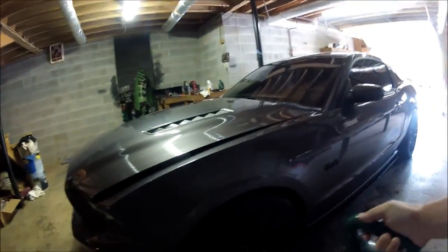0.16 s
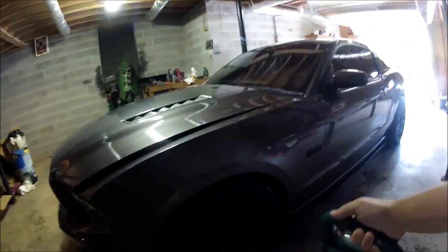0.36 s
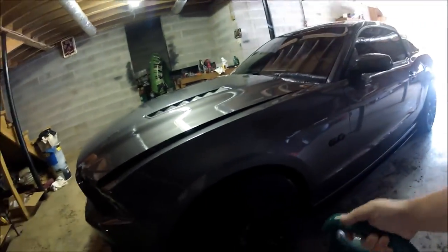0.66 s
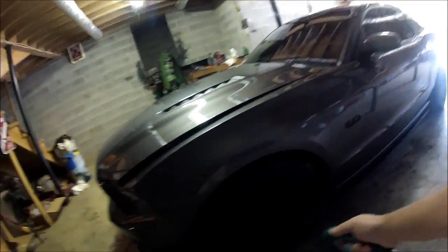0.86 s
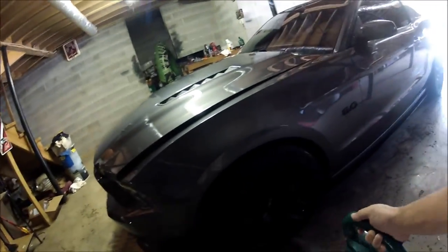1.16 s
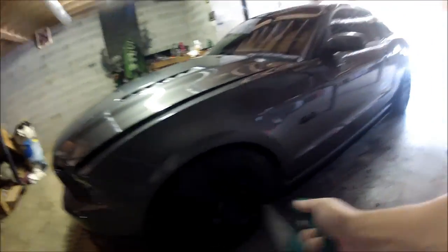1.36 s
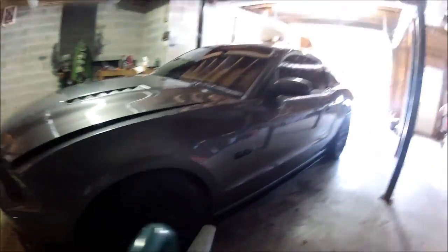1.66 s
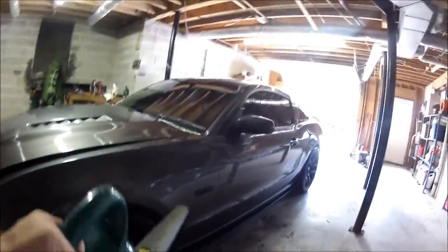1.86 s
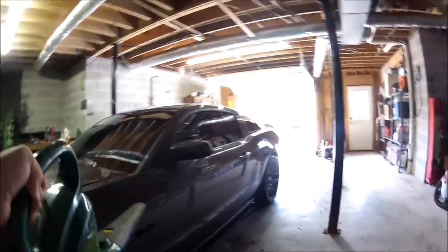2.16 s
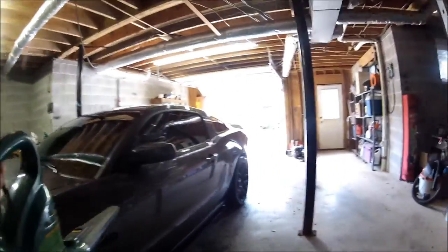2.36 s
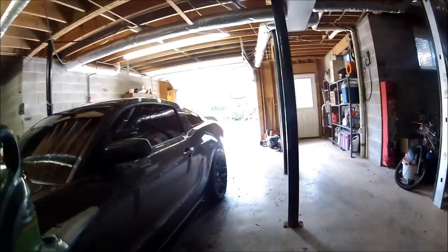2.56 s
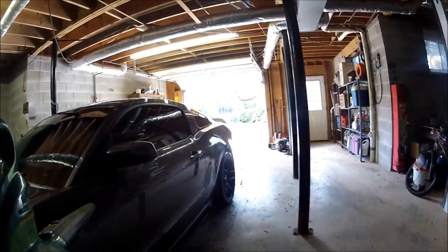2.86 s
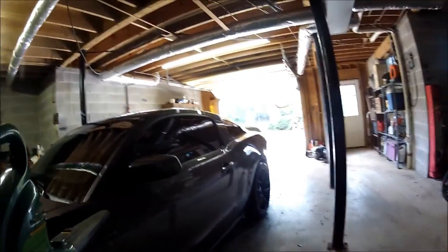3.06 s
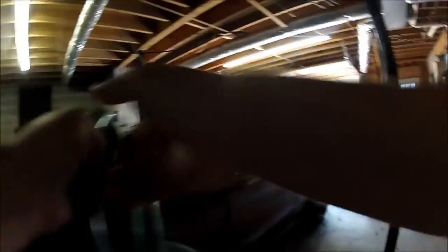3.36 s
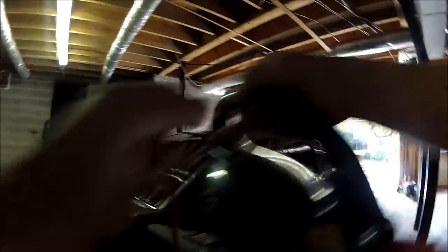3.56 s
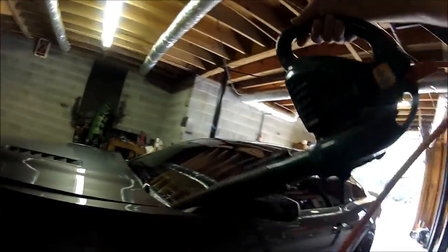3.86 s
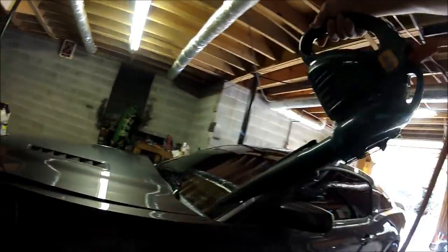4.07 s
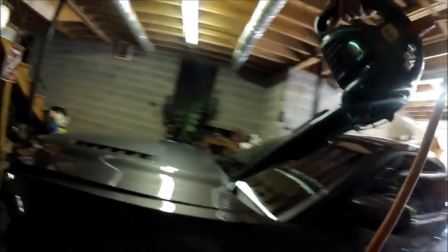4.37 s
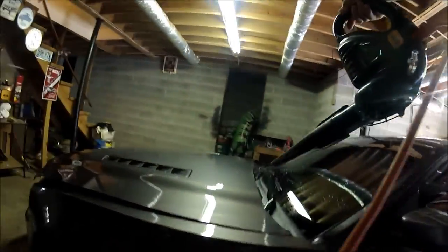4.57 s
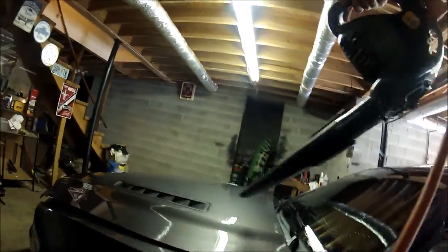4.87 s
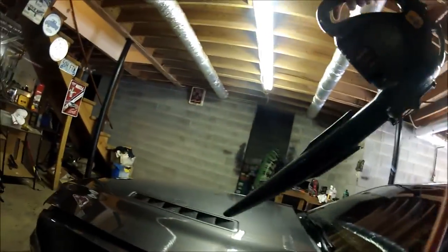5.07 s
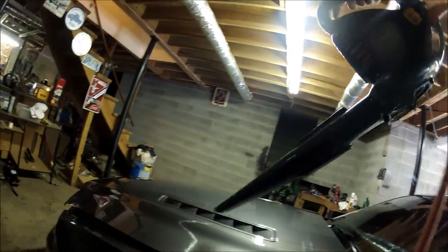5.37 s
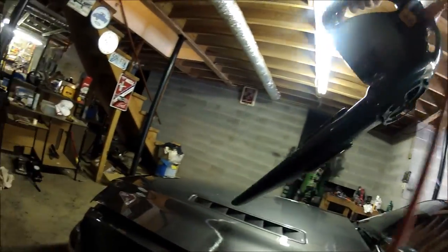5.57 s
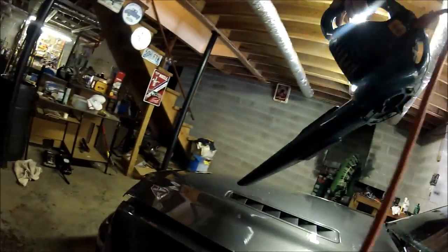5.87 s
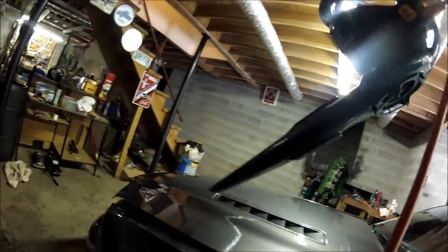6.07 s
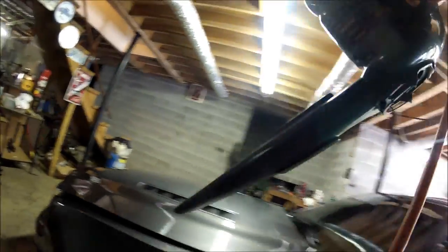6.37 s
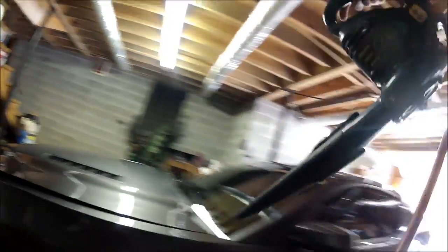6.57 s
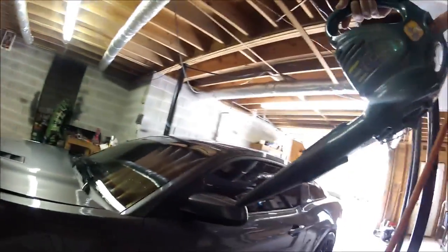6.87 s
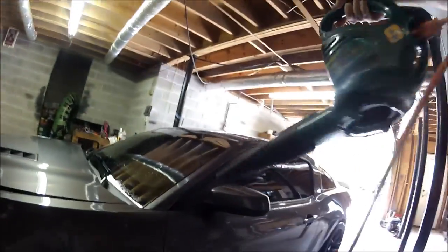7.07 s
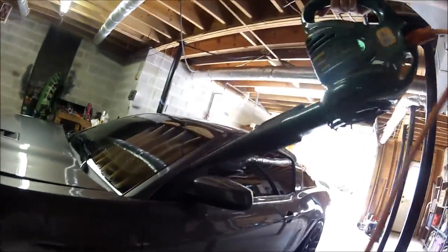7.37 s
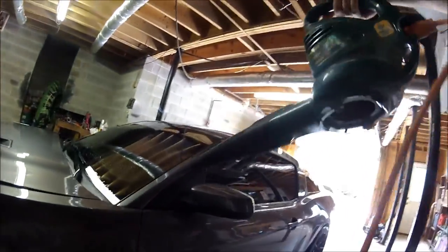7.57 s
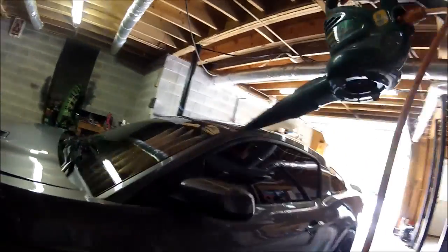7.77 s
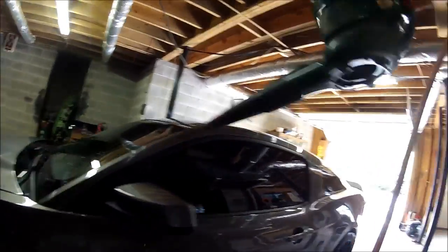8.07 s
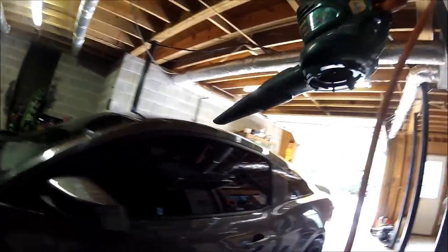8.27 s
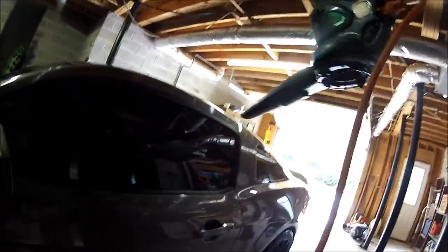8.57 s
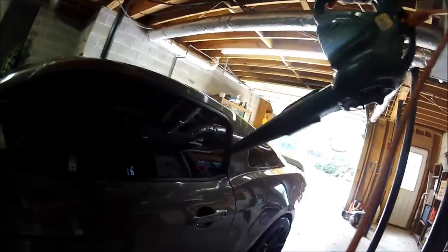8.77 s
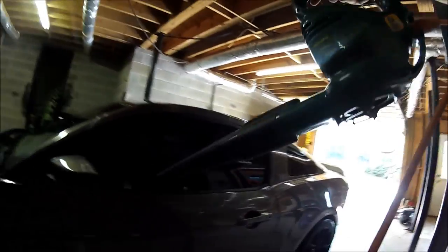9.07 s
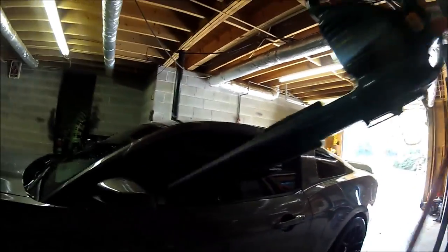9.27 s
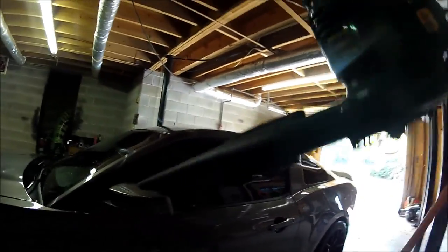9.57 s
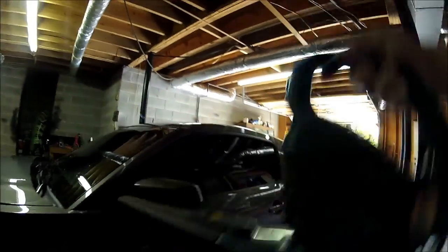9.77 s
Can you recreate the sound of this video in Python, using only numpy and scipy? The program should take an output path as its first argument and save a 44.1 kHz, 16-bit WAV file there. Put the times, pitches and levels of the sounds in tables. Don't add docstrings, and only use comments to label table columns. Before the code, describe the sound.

An electric leaf blower roars steadily at arm's length in a bare garage, with hissing air and a piercing, fluttering high whine.

```python
import sys
import numpy as np
from scipy import signal
from scipy.fft import rfft, irfft
from scipy.io import wavfile

SR = 44100
rng = np.random.default_rng(int(sys.argv[2]) if len(sys.argv) > 2 else 0)


def invert_db(level):
    return 10 ** (np.asarray(level, dtype=float) / 20)


def log_audio(samples):
    frames = np.atleast_2d(samples).T
    limited = np.clip(frames, -1, 1)
    pcm = np.round(limited * 32767).astype(np.int16)
    wavfile.write(sys.argv[1], SR, pcm)


N = 437472

# time in seconds, housing roar in dB, jet in dB,
# treble against the jet in dB as the intake faces the ear.
POSE = [(0.0, -11.5, -21.5, 1.5), (0.3, -13, -21.0, 0.5), (1.0, -11, -20.5, 1), (1.25, -12, -23.5, 3),
        (1.55, -13.5, -23.5, -5), (2.1, -13.0, -23.5, -1.5), (2.6, -12, -21.5, -1), (3.45, -12.0, -22, -1),
        (3.8, -18.5, -23.5, -3.5), (4.75, -13.5, -20.5, -5.5), (5.1, -15.5, -23, -1.5),
        (6.05, -17, -21.5, -4), (6.3, -15.5, -22.5, -6.5), (6.9, -12.5, -18.5, -6.5),
        (7.2, -15, -19.5, -4.5), (8.3, -16.0, -18.5, -5.5), (9.3, -15.0, -18.5, -7),
        (9.92, -12, -20.5, -2.5)]
# centre in seconds, length in seconds, roar change in dB, jet change in dB.
FLICKS = [(0.15, 0.08, -2.5, 1), (0.23, 0.072, -6, -1.5), (0.38, 0.1, 2, 1), (0.83, 0.14, -2.5, -1),
          (1.28, 0.097, -3.5, -2.5), (1.81, 0.4, 1.0, 2), (2.53, 0.097, 0.5, 0.5), (3.17, 0.12, -1.5, -0.5),
          (3.73, 0.15, 5, 3.5), (3.93, 0.08, 4.5, 3.5), (4.19, 0.11, 3, 3), (4.61, 0.057, -1.5, -3),
          (4.77, 0.2, 1.0, 2), (4.86, 0.08, -2.5, -0.0), (5.14, 0.14, 3.0, 2.5), (5.76, 0.11, 3, 3),
          (6.26, 0.19, 5, 0.5), (6.5, 0.059, -3.5, -1.5), (6.62, 0.086, -3.5, -1.5),
          (7.16, 0.089, -5.0, -3), (7.37, 0.11, -1, -4), (7.5, 0.08, 3, 2.0), (7.68, 0.12, -4.5, -2.5),
          (7.88, 0.23, 2.5, 0.5), (8.15, 0.12, -3, -5), (8.62, 0.054, 4, 2.5), (8.71, 0.066, -2.0, -2),
          (9.13, 0.08, -3, -3), (9.3, 0.076, -3.5, -6), (9.76, 0.091, -3.5, 1)]
# time in seconds, then the levels of blade tone, shaft order 15, order 1 and order 2 in dB.
BEAM = [(0.0, -14.5, -40, -52, -45), (0.3, -21, -29.5, -39, -57), (1.0, -26, -33.0, -47.0, -27),
        (1.25, -15.5, -27, -54, -48), (1.55, -27.5, -30, -38, -29), (2.1, -17.5, -29, -27.5, -24),
        (2.6, -22, -35, -35.5, -21), (3.45, -25, -24.5, -29, -23), (3.75, -15.5, -28.0, -38, -40),
        (4.75, -16.0, -32, -40, -41), (5.1, -16, -48, -49, -44), (6.05, -16, -38, -69, -61),
        (6.55, -15.5, -42, -31.5, -28), (6.75, -22, -28, -41, -28.5), (7.2, -13.5, -28, -41.5, -47),
        (8.3, -20.5, -31.0, -37.5, -40), (9.3, -16.5, -32, -39, -29.5), (9.92, -21, -34, -45.0, -22)]


def rms_one(x):
    return x / np.sqrt(np.mean(x ** 2) + 1e-20)


def in_time(rows):
    s, *columns = np.transpose(rows)
    return [np.interp(np.arange(N) / SR, s, column) for column in columns]


def swells(rows):
    s, length, *columns = np.transpose(rows)
    t = np.arange(0, N + 64, 64) / SR
    bells = np.exp(-((t[:, None] - s) / (length / 2)) ** 2)
    return [np.interp(np.arange(N) / SR, t, bells @ column) for column in columns]


def drift(rate):
    r = np.exp(-80 * np.pi * rate / SR)
    coarse = rng.standard_normal(N // 40 + 2002)
    slow = signal.lfilter([1], [1, -2 * r, r * r], coarse)[2000:]
    return np.interp(np.arange(N) / 40, np.arange(len(slow)), rms_one(slow))


def colour(x, points):
    hz, level_db = np.transpose(points)
    grid_hz = np.maximum(np.fft.rfftfreq(N, 1 / SR), 1)
    gain_db = np.interp(np.log(grid_hz), np.log(hz), level_db)
    return irfft(rfft(x) * invert_db(gain_db), N)


def resonance(x, hz, width_hz):
    r = np.exp(-np.pi * width_hz / SR)
    poles = [1, -2 * r * np.cos(2 * np.pi * hz / SR), r * r]
    return signal.lfilter([(1 - r * r) / 2, 0, (r * r - 1) / 2], poles, x)


def noise_band(x, low_hz, high_hz):
    return signal.sosfilt(signal.butter(2, [low_hz, high_hz], "band", fs=SR, output="sos"), x)


def turbulence(edges, tilt, patchy_db, gusty_db):
    out, white, gust = 0, rng.standard_normal((2, N)), drift(12.7)
    anchors = np.log([hz for hz, db in tilt])
    moves = np.array([db - np.mean(db) + np.zeros(N) for hz, db in tilt])
    for k, (low, high) in enumerate(zip(edges, edges[1:])):
        band = noise_band(white[k % 2], low, high)
        middle = np.log(low * high) / 2
        shares = [np.interp(middle, anchors, one) for one in np.eye(len(tilt))]
        flicker_db = patchy_db * (1 + 120 / low) * drift(9.1)
        out = out + band * invert_db(shares @ moves + flicker_db + gusty_db * gust)
    return out


def garage(x):
    t60_s, hop = 0.64, int(0.3 * SR)
    out = np.zeros(N + 3 * SR)
    t = np.arange(SR // 3) / SR
    for i in range(-hop, N, hop):
        start, end = max(i, 0), min(i + 2 * hop, N)
        piece = x[start:end] * np.sin(np.pi * (np.arange(start, end) - i) / (2 * hop))
        echoes = rng.standard_normal(len(t)) * invert_db(-60 * t / t60_s) * (t > .004)
        wet = signal.fftconvolve(piece, echoes / np.sqrt(np.sum(echoes ** 2)))
        out[start:start + len(wet)] += wet
    return out[:N]


def roar():
    # frequency in Hz, density in dB per Hz.
    roar_spectrum = [(15, -79), (25, -44), (145, -30.5), (328, -15.5), (415, -6.5), (446, -6.5),
                     (564, -5.5), (768, -3), (841, 0), (1280, 0), (1560, -12), (1900, -20), (2470, -12.5),
                     (4180, -120)]
    held_db = in_time(POSE)[0]
    level_db = held_db + swells(FLICKS)[0]
    bass_db = 0.067 * in_time(BEAM)[2] + 1.5 * drift(4.2)
    tilt = [(130, 0.9 * held_db), (380, bass_db), (800, 0)]
    air = turbulence(20 * 2 ** np.arange(.8, 7.1, .4), tilt, patchy_db=1.0, gusty_db=0.86)
    air = colour(air + invert_db(-9.0) * garage(air), roar_spectrum)
    return invert_db(level_db - 3.5) * rms_one(air)


def nozzle_song(song_db):
    # frequency in Hz, width in Hz, level in dB.
    nozzle = [
        (2380, 200, -2),
        (2760, 170, 0),
        (4100, 300, -5),
        (7750, 350, -9),
    ]
    # centre in seconds, length in seconds, resonance in Hz, rise in dB.
    songs = [(0.118, .15, 2760, 10), (2.55, .15, 4100, 12), (3.7, .15, 2380, 10), (4.35, .35, 2760, 7),
             (4.772, .15, 4100, 13), (4.8, .3, 2380, 4), (5.3, .2, 2380, 5), (5.9, 0.45, 2380, 9.5),
             (6.35, .45, 2760, 10.5), (6.897, 0.44, 2380, 9), (7.27, .12, 2760, 7), (7.5, .2, 2380, 5),
             (7.853, .35, 2760, 9.5), (8.8, .4, 2760, 1.5), (8.55, .3, 2380, 3), (8.9, 0.33, 2380, 6),
             (9.0, .3, 4100, -6)]
    out = 0
    for hz, width_hz, top_db in nozzle:
        breath = resonance(rng.standard_normal(N), hz, width_hz)
        song = rms_one(resonance(breath, hz, width_hz))
        mine = [(s, length, db * (abs(at_hz / hz - 1) < .07)) for s, length, at_hz, db in songs]
        (rise_db,) = swells(mine)
        follow_db = (hz < 3500) * (song_db - song_db.mean())
        out = out + song * invert_db(top_db - 16.5 + rise_db + follow_db + 1.15 * drift(5))
    return out


def jet():
    # frequency in Hz, density in dB per Hz.
    jet_spectrum = [(1000, -53), (1700, -10.5), (1890, -11), (2770, -7.5), (3320, -10.5), (4380, -9),
                    (5200, -6), (5330, -5), (5600, -4.5), (5730, -5.5), (8690, -16.5), (10200, -17.5),
                    (12000, -27), (15500, -65), (22000, -120)]
    # centre in seconds, length in seconds, change near 3.7 kHz in dB.
    shadows = [
        (.8, 0.41, -1),
        (1.57, .22, -12),
        (3.55, 0.15, -6),
        (8.15, .15, 2),
    ]
    held_db, treble_db = in_time(POSE)[1:]
    roar_flick_db, flick_db = swells(FLICKS)
    level_db = held_db + flick_db
    treble_db = treble_db + .3 * roar_flick_db - 0.15 * flick_db
    song_db = 0.48 * treble_db + 0.32 * held_db + 0.5 * drift(1.3)
    tilt = [(2500, song_db), (3700, swells(shadows)[0]), (5200, 0), (7500, treble_db)]
    air = turbulence(1300 * 2 ** np.arange(0, 3.4, .3), tilt, patchy_db=1, gusty_db=.5)
    air = rms_one(colour(air + invert_db(-11) * garage(air), jet_spectrum))
    return invert_db(level_db - 0.34) * (air + nozzle_song(song_db))


def beating(rows):
    t, out = np.arange(0, N + 64, 64) / SR, 0
    for first, last, spacing, share in rows:
        inside = np.clip(np.minimum(t - first, last - t) / spacing * 2 + 2, 0, 1)
        echo = inside * np.clip(share, 0, .95) * np.exp(2j * np.pi * (t - first) / spacing)
        out = out + 20 * np.log10(np.abs(1 - echo))
    return np.interp(np.arange(N) / SR, t, out)


def rotor():
    # time in seconds, blade passing rate in Hz.
    speed = [(0.0, 5468), (0.51, 5459), (1.2, 5458), (1.88, 5452), (2.57, 5446), (3.25, 5442), (3.93, 5445),
             (4.62, 5437), (5.3, 5434), (5.99, 5432), (6.67, 5427), (7.36, 5429), (8.04, 5433),
             (8.72, 5433), (9.41, 5426), (9.92, 5437)]
    # centre in seconds, length in seconds, change in dB.
    blade_beats = [(0.08, 0.053, -12), (0.2, 0.05, 4.5), (0.39, 0.099, -8), (0.78, 0.19, 6),
                   (1.55, 0.22, 10), (2.07, 0.037, -3), (2.21, 0.033, -12), (2.37, 0.027, -7),
                   (2.54, 0.04, -2), (2.59, 0.063, 6), (2.84, 0.17, 7.0), (3.21, 0.15, 7), (3.56, 0.11, 5),
                   (3.69, 0.074, -21), (3.86, 0.044, -4), (4.17, 0.05, -6), (4.74, 0.12, -9),
                   (5.12, 0.054, -4), (5.75, 0.052, -3), (6.11, 0.031, -4), (6.89, 0.05, -15),
                   (7.08, 0.029, -9), (7.24, 0.097, -15), (7.48, 0.17, -6.5), (7.79, 0.15, -12),
                   (8.11, 0.18, 4.5), (8.27, 0.05, -4), (8.57, 0.061, -9.0), (8.9, 0.047, -21),
                   (9.35, 0.061, -6)]
    # centre in seconds, length in seconds, change in dB.
    vane_beats = [(0.18, 0.07, -15.5), (0.41, 0.07, -7), (0.6, 0.07, -10.5), (0.76, 0.1, -19),
                  (1.27, 0.06, -9), (1.56, 0.07, -6.5), (1.8, 0.07, -12), (1.93, 0.05, -26),
                  (2.2, 0.06, -6), (2.4, 0.05, -27), (2.68, 0.11, -15), (3.06, 0.14, -17.0),
                  (3.25, 0.1, -17.0), (3.85, 0.07, -10.0), (4.11, 0.07, -13), (4.6, 0.15, -9),
                  (4.98, 0.22, 8), (5.13, 0.07, 6), (5.76, 0.1, 8), (6.86, 0.06, -8), (7.06, 0.1, -7),
                  (7.33, 0.08, -6), (7.44, 0.07, -11.0), (7.75, 0.07, -5), (8.15, 0.1, 0), (8.4, 0.24, 6),
                  (8.74, 0.064, -4), (8.98, 0.07, 5), (9.4, 0.07, -11), (9.77, 0.064, -12.5)]
    # first gap in seconds, last gap in seconds, gap spacing in seconds, echo share from 0 to 1.
    sweeps = [
        (.385, .70, .105, 0.7),
        (.85, 1.04, 0.065, 0.74),
        (1.32, 1.46, 0.057, 0.26),
        (1.61, 1.96, 0.063, 0.4),
        (6.655, 6.74, 0.093, 0.56),
        (7.79, 7.97, .09, 0.2),
        (8.565, 8.675, .055, 0.4),
        (9.705, 9.838, .0665, 0.34),
    ]
    # shaft order, mains shift in Hz, level against order 1 in dB.
    hum = [
        (0, 240, -17),
        (1, 240, 1),
        (2, 480, -5),
    ]
    # shaft order, level against the blade tone in dB.
    faint = [
        (12, -24),
        (24, -44),
    ]
    (blade_hz,) = in_time(speed)
    blade_db, vane_db, db1, db2 = in_time(BEAM)
    wobble_hz = .17 * drift(5) + .27 * drift(30)
    turns = 2 * np.pi * np.cumsum(blade_hz / 13 + wobble_hz) / SR
    t = 2 * np.pi * np.arange(N) / SR

    def line(order, level_db, echo, rate, shift_hz=0):
        paths = 1 + echo * (drift(rate) + 1j * drift(rate))
        return invert_db(level_db) * np.real(paths * np.exp(1j * (order * turns + shift_hz * t)))

    direct_db = blade_db + 1.07 * swells(blade_beats)[0] + beating(sweeps)
    vane_line_db = vane_db + swells(vane_beats)[0] + 1.7
    double_db = -45 + 0.18 * (vane_db - vane_db.mean()) - 0.26 * (blade_db - blade_db.mean())
    out = line(13, direct_db + 0.78, echo=invert_db(-33.5 - blade_db), rate=11.5)
    out += line(15, vane_line_db, echo=invert_db(-42 - vane_db), rate=36)
    out += line(26, double_db, echo=0.75, rate=8.1)
    out += line(1, db1 + 0.2, echo=0.45, rate=13.0)
    out += line(2, db2 + 0.1, echo=0.58, rate=13.4)
    for order, shift_hz, db in hum:
        out += line(order, db1 + db + 1, echo=.6, rate=9, shift_hz=shift_hz)
    for order, db in faint:
        out += line(order, direct_db + db, echo=.6, rate=13)
    return out


def bump():
    # time in seconds, pitch in Hz, 60 dB decay in seconds, peak in dB.
    knocks = [
        (1.671, 180, 0.19, -25),
    ]
    t = np.arange(N) / SR
    out = np.zeros(N)
    for s, hz, t60, db in knocks:
        age = np.maximum(t - s, 0)
        onset = 1 - np.exp(-age / 0.0067)
        out += invert_db(db - 60 * age / t60) * onset * np.sin(2 * np.pi * hz * age)
    return out


def spray():
    # centre in seconds, length in seconds, level in dB.
    splashes = [
        (7.668, .035, -27),
    ]
    t = np.arange(N) / SR
    hiss = rms_one(noise_band(rng.standard_normal(N), 8500, 10200))
    return hiss * sum(invert_db(db) * np.exp(-((t - s) / (length / 2)) ** 2) for s, length, db in splashes)


def scene():
    air = roar() + jet() + spray()
    return (air * invert_db(0.71 * drift(8)) + rotor() + bump())[None]


def roll_off(x):
    return signal.sosfilt(signal.butter(12, 17030, fs=SR, output="sos"), x)


def record(dry):
    limited = 1.6 * np.tanh(dry / 1.6)
    low_rate = signal.resample_poly(limited, 80, 147, axis=1)
    held = signal.resample_poly(np.repeat(low_rate, 2, axis=1), 147, 160, axis=1)[:, :N]
    held = signal.sosfilt(signal.butter(1, 55, "high", fs=SR, output="sos"), held)
    held = irfft(rfft(held) * (np.fft.rfftfreq(N, 1 / SR) < 15740), N)
    return roll_off(held)


dry = scene()
out = record(dry)
log_audio(out)
```